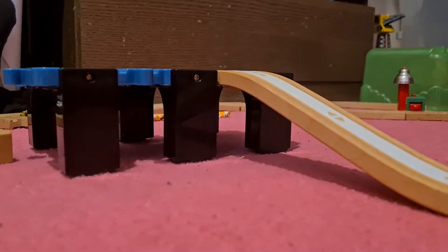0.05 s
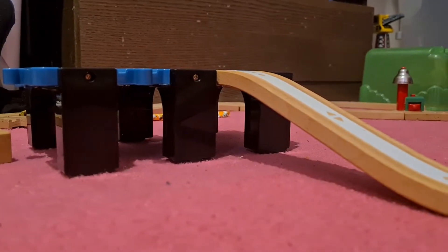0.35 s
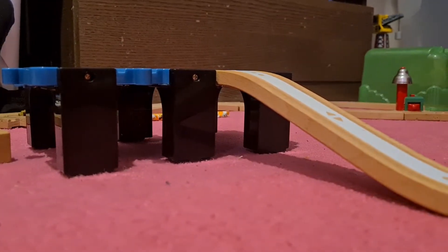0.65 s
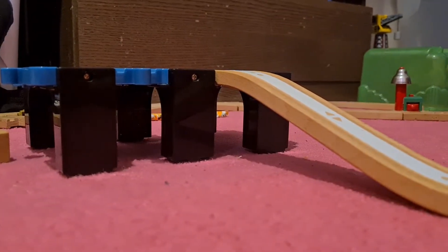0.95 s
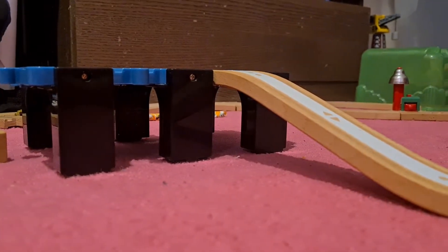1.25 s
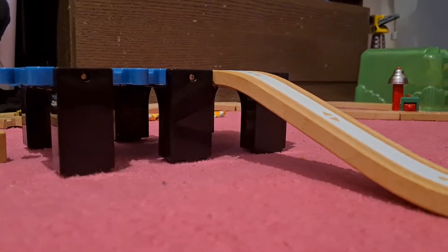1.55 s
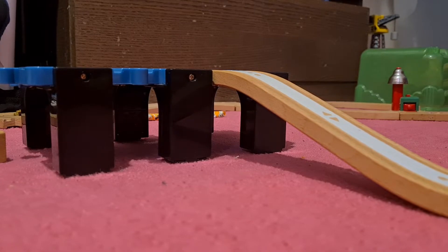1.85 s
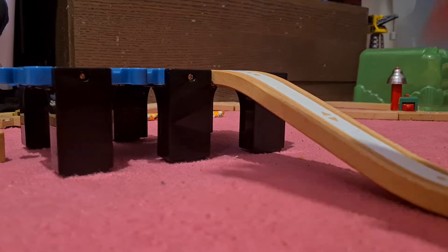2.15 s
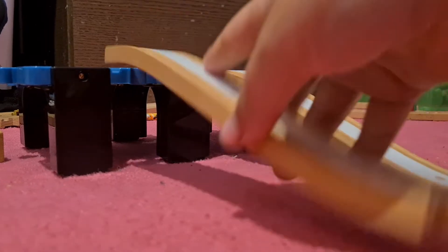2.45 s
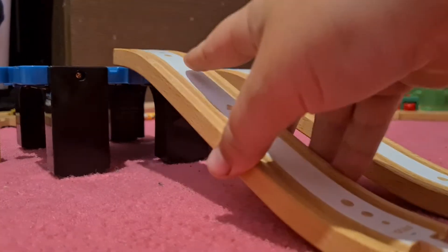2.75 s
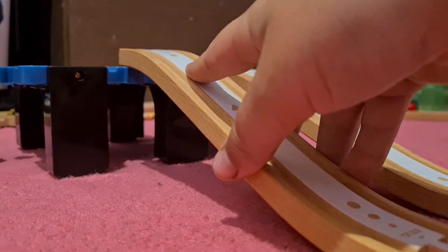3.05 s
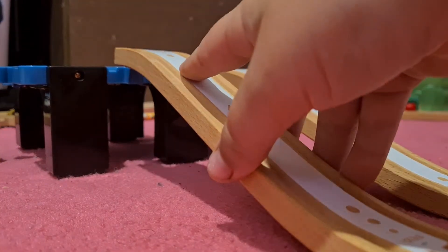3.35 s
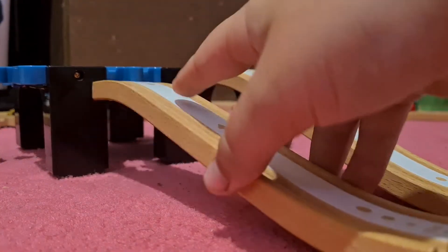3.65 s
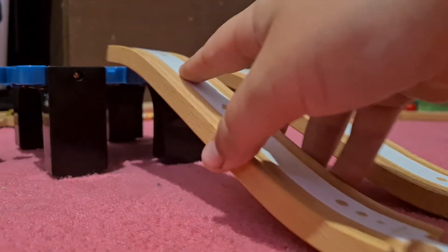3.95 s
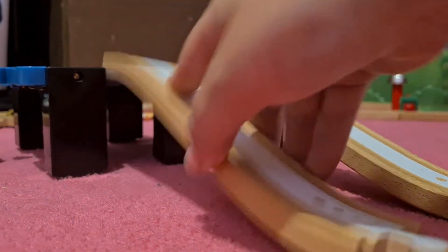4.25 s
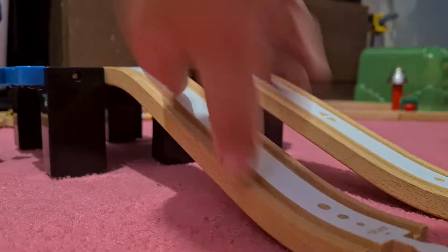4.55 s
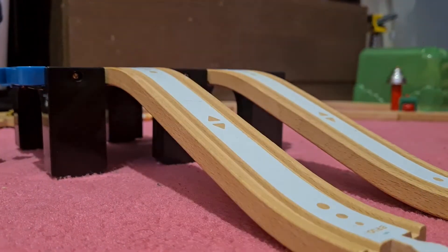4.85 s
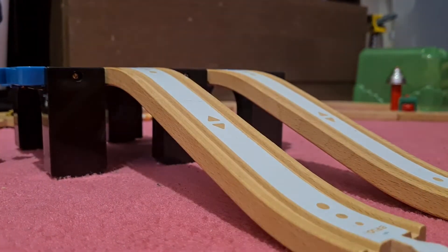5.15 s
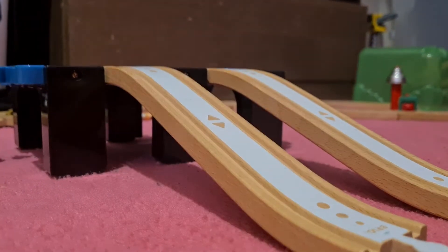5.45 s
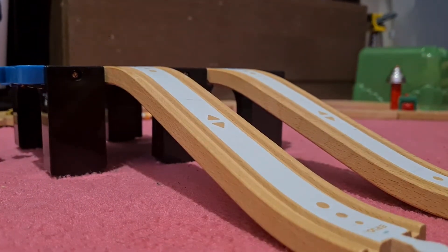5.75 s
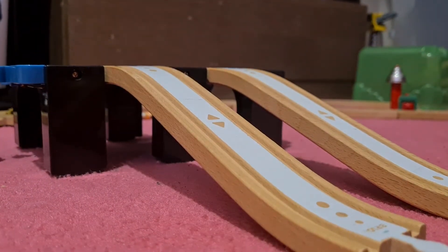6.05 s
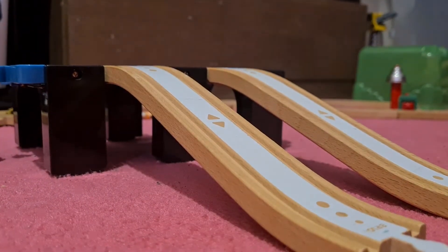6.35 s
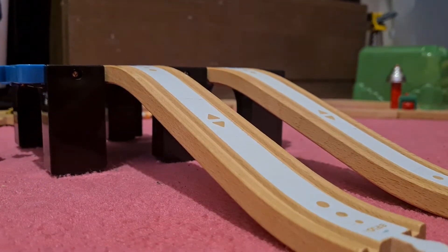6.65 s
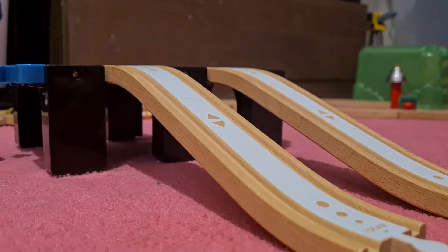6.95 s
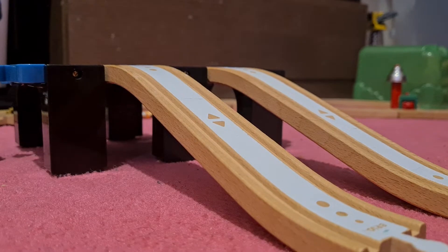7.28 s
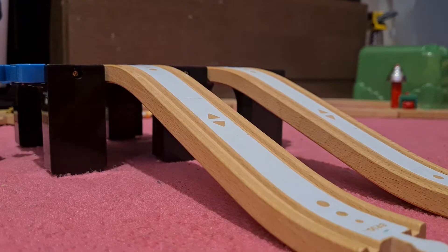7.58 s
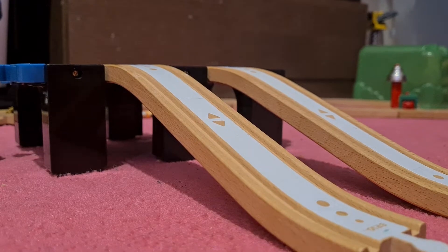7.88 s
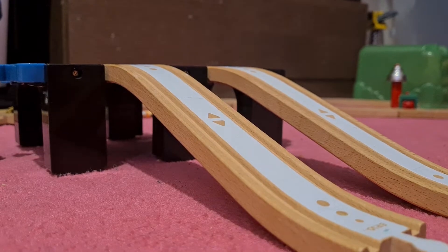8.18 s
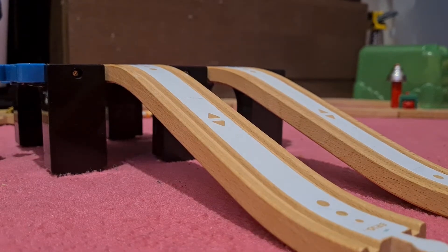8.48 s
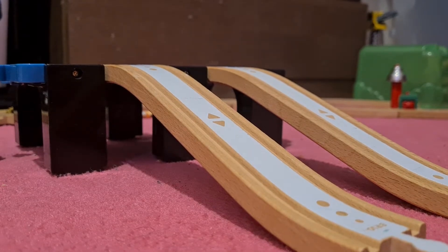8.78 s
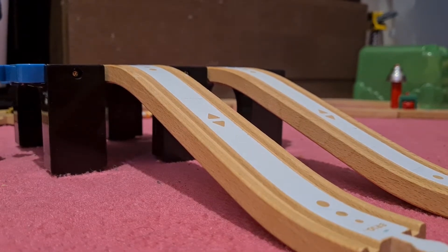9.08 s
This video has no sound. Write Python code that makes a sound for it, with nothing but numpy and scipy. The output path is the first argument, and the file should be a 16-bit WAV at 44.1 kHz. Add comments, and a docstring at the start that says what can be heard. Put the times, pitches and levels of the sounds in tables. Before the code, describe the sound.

In a quiet room, loose wooden toy track pieces clatter briefly on the left. Close to the microphone, a wooden ramp then knocks several times against plastic bridge piers, with soft bumps on the floor, and lands with a sharp clack. A hand rummages through the pile for about two seconds, the pieces sliding, clicking and knocking. Faint finger rubs and carpet brushing fade into room tone.

```python
"""Wooden toy track on a carpet

Indoors, close up, on the two microphone ports of a small stereo camera. A curved wooden ramp is
knocked against plastic bridge piers until it drops into place, ringing at each touch. Off to the
left a hand rummages through loose pieces, which slide, knock and clatter. Fingers rub the wood
and brush the carpet; behind it all lies quiet room tone, with a faint rumble near the end."""
import sys
import numpy as np
from scipy import signal
from scipy.fft import rfft, irfft, next_fast_len
from scipy.io import wavfile
from scipy.ndimage import uniform_filter1d

SR = 44100
rng = np.random.default_rng(int(sys.argv[2]) if len(sys.argv) > 2 else 0)


def to_wav(sig):
    """Store sig (one row per channel, or 1-D mono) as 16-bit WAV at the path in sys.argv[1].

    Samples outside -1..1 are clipped; the rate is SR.
    """
    pcm = np.clip(np.atleast_2d(sig), -1, 1) * 32767
    pcm = np.round(pcm).astype(np.int16)
    wavfile.write(sys.argv[1], SR, pcm.T)  # frames by channels


N = 411012
T = np.arange(SR // 5) / SR  # seconds since a blow
PILE_LEAD_MS = .47  # sound from the pile reaches the left port first

# Loose pieces slide over each other. Each row: start in seconds, length in seconds, relative dB.
SLIDES = [(.215, .045, -47), (0.272, .05, -36), (0.403, 0.044, -40), (0.491, .06, -40), (1.278, 0.036, -60),
          (5.071, .065, -31), (5.235, 0.024, -30), (5.277, .06, -39.5), (5.41, .03, -51),
          (5.51, .14, -45.5), (5.814, .045, -47.5), (6.087, .05, -49), (6.184, .12, -34),
          (6.361, 0.11, -44.5), (6.574, .06, -25), (6.749, .12, -57), (6.908, .1, -37),
          (7.059, .035, -29.5), (7.118, .05, -44.5)]
# Friction spectra of wood on wood and of fingers. Each row: frequency in Hz, relative level in dB.
SLIDE_SPECTRUM = [(30, -22), (70, -8.5), (160, -14.5), (300, 3), (1100, 3), (1600, -2), (2500, 3.5),
                  (3400, -10), (4300, -10.5), (5300, -23.5), (6600, -20), (9500, -47), (12000, -26),
                  (16000, -36)]
FINGER_SPECTRUM = [(200, -20), (900, -3.5), (2300, 1.5), (4200, 2.5), (6500, 4), (9500, -15), (12500, -9),
                   (16000, -12)]
# The ports hear pile and ramp unevenly. Each row: frequency in Hz, left minus right in dB.
PILE_SHADE = [(250, 0.5), (700, -2), (1000, -1), (1300, 3), (1900, 0.5), (2600, 0.5), (9000, -1)]
RAMP_SHADE = [(200, -4.5), (1200, -2.5), (2300, -1.5), (9000, -1)]


def amp(db):
    """Decibels to gain."""
    return 10 ** (np.asarray(db) / 20)


def unit(x):
    """Scale to rms 1."""
    return x / np.sqrt(np.mean(x ** 2) + 1e-20)


def punch(x):
    """Scale a blow to rms 1 over its first hundredth of a second."""
    return x / np.sqrt(np.mean(x[..., :SR // 100] ** 2) + 1e-20)


def along(points, hz):
    """Interpolate (Hz, value) points on a log frequency axis."""
    freqs, values = np.transpose(points)
    return np.interp(np.log(hz + 1), np.log(freqs + 1), values)


def level(rows):
    """(seconds, dB) rows as a gain per sample, silent outside them."""
    times, db = np.transpose(rows)
    return amp(np.interp(np.arange(N) / SR, times, db, left=-140, right=-140))


def filtered(x, response):
    """Filter x by a complex function of frequency."""
    n = x.shape[-1]
    size = next_fast_len(n + SR // 20)
    return irfft(rfft(x, size) * response(np.fft.rfftfreq(size, 1 / SR)), size)[..., :n]


def causal(spectrum, size=2048):
    """The minimum-phase impulse response of a (Hz, dB) spectrum."""
    cepstrum = irfft(np.log(amp(along(spectrum, np.fft.rfftfreq(size, 1 / SR)))))
    cepstrum[1:size // 2] *= 2
    cepstrum[size // 2 + 1:] = 0
    return irfft(np.exp(rfft(cepstrum)))


def convolve(x, response):
    """Both channels of x through an impulse response, cut to the length of x."""
    return signal.fftconvolve(x, np.atleast_2d(response), axes=1)[:, :x.shape[1]]


def fade(t, t60):
    """Decay by 60 dB in t60 seconds."""
    return np.exp(-np.log(1000) * t / t60)


def stereo_noise(n, width):
    """White noise whose side signal is width times as strong as its middle."""
    mid, side = rng.standard_normal((2, n))
    return np.array([mid + width * side, mid - width * side])


def add(track, start, x):
    """Mix x into the track at start seconds."""
    part = track[:, max(round(start * SR), 0):][:, :x.shape[1]]
    part += x[:, :part.shape[1]]


def place(x, lead_ms, shade=((1, 0), (2, 0))):
    """Sound reaches the nearer port first (positive lead: left); the housing shades each port."""
    sign = np.array([[1], [-1]]) / 2
    lag = (abs(lead_ms) / 2 - sign * lead_ms) / 1000
    return filtered(x, lambda hz: np.exp(-2j * np.pi * hz * lag) * amp(sign * along(shade, hz)))


def in_room(x, wet_db):
    """The direct sound and the walls' diffuse answer, which builds over a few milliseconds."""
    # The room's decay. Each row: frequency in Hz, t60 in seconds.
    decay_times = [(100, 0.54), (400, 0.27), (1000, 0.18), (2500, 0.17), (6000, 0.23), (14000, 0.13)]
    # The colour of the reverberation. Each row: frequency in Hz, gain in dB.
    tail_colour = [(50, -11.5), (250, 3), (700, 1), (2200, -1.5), (4500, 1.5), (8000, 3.5), (14000, 8.5)]
    hz, t, bands = signal.stft(rng.standard_normal((2, SR // 2)), SR, nperseg=256)
    bands = bands * fade(t, along(decay_times, hz)[:, None])
    bands[1] *= np.minimum(hz / 600, 1)[:, None]  # long waves reach both ports alike
    mid, side = signal.istft(bands, SR, nperseg=256)[1]
    age = np.arange(len(mid)) / SR
    tail = filtered(unit(np.array([mid + side, mid - side])), lambda f: amp(along(tail_colour, f)))
    tail *= (1 - np.exp(-(age / 0.0028) ** 2)) / np.sqrt(len(age))
    out = amp(wet_db) * signal.fftconvolve(x, tail, axes=1)
    out[:, :x.shape[1]] += x
    return out


def room_tone():
    """Faint air all round the camera, alike at both ports in the bass."""
    # The quiet room. Each row: time in seconds, level in dB.
    hush = [(0, -64), (1, -66), (3.6, -68), (4.8, -63), (9.3, -69)]
    # Its spectrum. Each row: frequency in Hz, relative level in dB.
    air = [(20, -21), (45, -10), (70, 2.5), (150, -10.5), (480, -7), (850, -15), (1400, -16), (2700, -19.5),
           (4000, -25.5), (5400, -21), (7300, -27.5), (9000, -42), (12500, -32), (16000, -37.5)]
    # Likeness at the two ports. Each row: frequency in Hz, left-right correlation.
    likeness = [(60, 1), (240, 0.82), (950, 0.29), (3770, -0.21), (15000, 1)]

    def mid_side_gains(hz):
        angle = np.arccos(np.clip(along(likeness, hz), -1, 1)) / 2
        return amp(along(air, hz)) * [np.cos(angle), np.sin(angle)]

    mid, side = filtered(rng.standard_normal((2, N)), mid_side_gains)
    return level(hush) * unit(np.array([mid + side, mid - side]))


def rumble():
    """A faint, dull rumble comes up near the end, much alike at both ports."""
    # Its swell. Each row: time in seconds, level in dB.
    swell = [(7.6, -91), (8.8, -71.5), (9.0, -65.5), (9.32, -65)]
    colour = causal([(20, -17), (65, 1.0), (220, -12.0), (450, -19.0), (1500, -69)])
    return level(swell) * unit(convolve(stereo_noise(N, width=.25), colour))


def bumps():
    """Hand and wood bump the floor in front of the camera, and near 1.46 s a double knock lands on the camera
    body itself: padded contacts that die quickly."""
    # Each row: start in seconds, level before the low-pass in dB, pitch in Hz, t60 and rise in seconds.
    contacts = [(.176, -18.5, 328.5, 0.025, 0.00067), (0.18, -31, 98.6, .06, 0.0017),
                (1.4635, 9.5, 597, 0.003, 0.0019), (1.4624, -47, 168, 0.02, 0.00058),
                (2.595, -32.5, 60.3, .1, .005), (2.654, -24.5, 106, 0.039, 0.0093),
                (3.875, -28, 103.6, 0.058, 0.016), (4.414, -28, 74.5, 0.21, .004),
                (4.43, -27.5, 152, .1, 0.0029), (5.485, -25.5, 83, 0.088, 0.0018),
                (7.39, -51, 62.53, 0.12, 0.004)]
    lowpass = signal.butter(6, 850, fs=SR, output="sos")
    out = np.zeros((2, N))
    for start, db, hz, t60, rise in contacts:
        push = amp(db) * np.sin(2 * np.pi * hz * T) * fade(T, t60) * (1 - np.exp(-T / rise))
        push = signal.sosfilt(lowpass, push)
        at_ports = place(np.array([push, push]), lead_ms=-.08, shade=RAMP_SHADE)
        add(out, start, in_room(at_ports, wet_db=-13.5))
    return out


def strokes(rows, rise_db_per_s, fall_db_per_s):
    """Gain per sample of (start, length, dB) strokes that swell, hold and die away."""
    t = np.arange(N) / SR
    curves = [db - rise_db_per_s * np.maximum(start - t, 0)
              - fall_db_per_s * np.maximum(t - start - length, 0) for start, length, db in rows]
    return amp(np.max(curves, axis=0))


def friction(spectrum, slips_per_s, spread_db, hiss):
    """Tiny slips of uneven size over a fine hiss, coloured by the surface."""
    slipping = rng.random(N) < slips_per_s / SR
    slips = slipping * amp(spread_db * np.minimum(rng.standard_normal(N), 2))
    return unit(convolve(stereo_noise(N, width=0.72) * (unit(slips) + hiss), causal(spectrum)))


def carpet_brush():
    """A hand brushes the carpet and slides off the pile: soft, dense friction."""
    # Each row: start in seconds, length in seconds, relative level in dB.
    passes = [(0, 0.26, -68.5), (1.3, 0.034, -62), (1.48, 0.42, -69.5), (6.04, 0.055, -70.5),
              (7.12, .04, -57), (7.38, .03, -68.5), (7.62, .25, -68)]
    envelope = strokes(passes, rise_db_per_s=217, fall_db_per_s=168)
    return envelope * friction(FINGER_SPECTRUM, slips_per_s=1800, spread_db=2.0, hiss=1.1)


def finger_rub():
    """Fingers rub the ramp with uneven pressure and make it sing faintly."""
    # Each row: start in seconds, length in seconds, relative level in dB.
    rubs = [(1.82, 0.028, -54.5), (2.045, .04, -55), (2.86, 0.048, -68.5), (3.53, .03, -63.5),
            (7.32, 0.023, -59), (7.78, 0.038, -70), (7.94, 0.038, -66), (9.235, 0.045, -57.5)]
    # The ramp's resonances, damped by the fingers. Each row: centre in Hz, width in Hz, relative dB.
    resonances = [(2290, 170, -5.5), (4080, 110, -7), (6800, 3400, -17)]

    def wood(f):
        return sum(amp(db) / (1 + 2j * (f - hz) / width_hz) for hz, width_hz, db in resonances)

    pressure = amp(4.8 * unit(uniform_filter1d(rng.standard_normal(N), size=900)))
    drag = pressure * friction(FINGER_SPECTRUM, slips_per_s=400, spread_db=2, hiss=0.62)
    return strokes(rubs, rise_db_per_s=800, fall_db_per_s=226) * unit(filtered(drag, wood))


def pile_scrape():
    """Loose pieces slide over each other on the left: grainy friction of wood on wood."""
    envelope = strokes(SLIDES, rise_db_per_s=601, fall_db_per_s=327)
    grain = friction(SLIDE_SPECTRUM, slips_per_s=290, spread_db=-0.5, hiss=0.26)
    return place(envelope * grain, PILE_LEAD_MS, PILE_SHADE)


def handling():
    """Scraping, brushing and rubbing, heard together in the room."""
    direct = amp(-2.0) * pile_scrape() + amp(-0.5) * carpet_brush() + amp(-4.0) * finger_rub()
    return in_room(direct, wet_db=-4.0)[:, :N]


def scuffs():
    """Skin sweeps quickly over the wood: a bright hiss that stops when the hand lifts."""
    # Each row: start in seconds, length in seconds, level in dB.
    sweeps = [(6.287, 0.026, -52.5), (7.17, 0.073, -52.5), (7.385, .035, -60.5)]
    # Skin on wood. Each row: frequency in Hz, relative level in dB.
    spectrum = [(1500, -18.5), (4000, -3.5), (6500, 2.5), (9500, -6), (12500, -1), (16000, -4)]
    envelope = strokes(sweeps, rise_db_per_s=696, fall_db_per_s=900)
    skin = friction(spectrum, slips_per_s=2500, spread_db=0.5, hiss=1.2)
    return in_room(place(envelope * skin, PILE_LEAD_MS), wet_db=-13.5)[:, :N]


def mode(hz, t60, attack_s=.0007):
    """One damped mode, heard at slightly different phases by the two ports."""
    phase = rng.uniform(0, 2 * np.pi) + rng.normal(0, 0.25, (2, 1))
    return np.sin(2 * np.pi * hz * T + phase) * fade(T, t60) * (1 - np.exp(-T / attack_s))


def ringing(modes, scatter_db):
    """A struck body sounds all its (Hz, dB, t60) modes, in a new balance at each blow."""
    return punch(sum(amp(db + rng.normal(0, scatter_db)) * mode(hz, t60) for hz, db, t60 in modes))


def burst(colour, t60, rise, width):
    """A contact wakes a crowd of modes; most of them die within the first instant."""
    decay = fade(T, t60) + 0.51 * fade(T, 0.11 * t60)
    return punch(convolve(stereo_noise(len(T), width) * decay * (1 - np.exp(-T / rise)), colour))


def blow_levels(db, hard_db, voice):
    """Thud, knock, clack and crack levels in dB: a harder contact cracks more and knocks less."""
    thud_db, knock_db, clack_db, crack_db = voice
    return .6 * db + thud_db, db + knock_db - hard_db, db + clack_db, db + crack_db + hard_db


def blow(levels, knock_hz, hollow_t60, crack_t60):
    """Wood strikes: the support thuds and knocks hollowly, the piece clacks, the contact cracks."""
    # Spectra of the four parts. Each row: frequency in Hz, relative level in dB.
    thud_spectrum = [(20, -32), (45, -2), (80, -5.5), (110, 0), (170, 0), (270, 6), (380, -2), (550, -21),
                     (2000, -100)]
    knock_spectrum = [(150, -27.5), (350, -9), (480, -0.5), (800, -1.5), (1250, 7), (1600, -14),
                      (2600, -42), (7000, -100)]
    clack_spectrum = [(700, -37.5), (1300, -7.5), (1700, -4.5), (2200, -2), (2800, 0), (3300, -15.5),
                      (4200, -21), (10000, -85.5)]
    crack_spectrum = [(1800, -26), (3200, -4), (4300, 4), (5300, -7.5), (6300, -1), (7700, -8.5),
                      (9500, -23.5), (12000, -21), (16000, -40.5)]
    thud_db, knock_db, clack_db, crack_db = levels
    rise = 0.0021 * amp(-.45 * (max(knock_db, clack_db) + 23.0))  # light touches start softly
    knock = burst(causal(knock_spectrum), t60=0.027, rise=rise, width=1.0)
    knock = punch(knock + 1.5 * punch(mode(knock_hz, hollow_t60)))
    thud = burst(causal(thud_spectrum), t60=0.029, rise=rise, width=0.18)
    clack = burst(causal(clack_spectrum), t60=0.025, rise=rise, width=0.97)
    crack = burst(causal(crack_spectrum), t60=crack_t60, rise=rise, width=0.63)
    return amp(thud_db) * thud + amp(knock_db) * knock + amp(clack_db) * clack + amp(crack_db) * crack


def pre_swell(db, lead_ms, swell_s):
    """A faint, very short swell of noise leads into each hit."""
    dying = convolve(stereo_noise(len(T), width=0.51) * np.exp(-T / swell_s), causal(SLIDE_SPECTRUM))
    swelling = np.pad(punch(dying)[:, ::-1], ((0, 0), (0, SR // 500)))
    return amp(db) * place(swelling, lead_ms)


def snaps():
    """Hard edges snap past each other, so briefly that they reach the top of the treble."""
    # Each row: start in seconds, relative level in dB.
    contacts = [(.5132, -49), (1.4642, -41.5), (4.4138, -25.5), (4.433, -46.5), (5.109, -42), (5.2625, -38),
                (5.5388, -42), (6.1668, -36.5), (6.557, -32), (6.585, -30), (7.0876, -35)]
    # The colour of a snap. Each row: frequency in Hz, relative level in dB.
    spectrum = [(900, -28), (1500, -2), (2400, 6.5), (3300, -4), (4400, 0.5), (5400, -5), (7000, 0.5),
                (9500, -8.5), (12000, 0.5), (16000, -6.5)]
    out, colour = np.zeros((2, N)), causal(spectrum)
    edge = punch(np.pad(colour, (0, len(T) - len(colour))))
    for start, db in contacts:
        snap = .65 * edge + 0.66 * burst(colour, t60=0.026, rise=.0004, width=0.64)
        add(out, start, in_room(amp(db) * place(snap, PILE_LEAD_MS), wet_db=-10.5))
    return out


def jostles(touches_per_s=15):
    """While the pile slides, pieces touch lightly at random: more strikes for loose_pieces()."""
    rows = []
    for start, length, db in SLIDES:
        count = int(np.ceil(length * touches_per_s))
        for when, softness, hardness, pitch in rng.random((12, 4))[:count]:
            ring_hz, knock_hz = 1900 + 900 * pitch, 850 + 450 * pitch
            hard_db = 8 * (hardness - .5)
            rows.append((start + when * length, db - 6 * softness, hard_db, -4, ring_hz, knock_hz))
    return rows


def loose_pieces():
    """On the left, each struck piece rings at the pitch its length gives it and shakes the pile."""
    # Each row: start in seconds; strength, hardness and relative ring in dB; ring and knock in Hz.
    strikes = [(0.175, -53.5, -1.5, -21, 2150, 693), (0.2736, -37.5, 5, -0.5, 1890, 1210),
               (0.2964, -35, -5, 0, 2240, 1115), (.3083, -42.5, -9, 4, 2300, 1066),
               (.379, -33, 4, 3, 1935, 1133), (0.3946, -36.5, 2.5, 1, 2040, 1016),
               (0.4363, -35.5, 1.5, -8, 2700, 1126), (0.5129, -30.5, -1, 5.5, 2224, 866),
               (0.5341, -33.5, 5.5, -10.5, 2300, 1372), (5.0596, -25.5, 2, -4.5, 2010, 1134),
               (5.1075, -25, 0.5, -20, 2070, 803), (5.1236, -27.5, 2.5, -0.5, 2170, 798),
               (5.1308, -23.5, 3.5, 0, 2170, 1203), (5.184, -43, 10, -11.5, 2000, 1157),
               (5.2185, -23.5, 0, 8.5, 3057, 1240), (5.2378, -23.5, -2, -6, 2940, 1036),
               (5.2616, -19.5, 4, -3.5, 2556, 1026), (5.322, -32, 2.5, -18, 2460, 1090),
               (5.3464, -45, 5.5, -4.5, 2400, 1040), (5.3812, -41, 2, -8, 2330, 1212),
               (5.4361, -52.5, -7.5, 6.5, 2360, 1015), (5.4781, -41, -4.5, -1.5, 2290, 1009),
               (5.5379, -25.5, 4.5, -4.5, 2990, 1117), (5.558, -40.5, -4, -1.5, 2250, 577),
               (5.6024, -39.5, -0.5, -3.5, 2240, 1250), (5.8204, -28, 5.5, -1, 2384, 1028),
               (5.9787, -66, -1, 14, 2430, 993), (6.1129, -36.5, -3, 2.5, 2270, 1153),
               (6.166, -16, 2, -9.5, 2274, 1069), (6.2385, -35.5, -4, -1, 2430, 1113),
               (6.2604, -30.5, -1, 8, 2720, 982), (6.2816, -36.5, -3, -3, 2330, 1027),
               (6.292, -30, 8, -15.5, 2270, 1066), (6.3361, -36.5, 3, 0.5, 2325, 890),
               (6.3953, -29.5, 0, 11, 2237, 922), (6.4272, -37.5, -12.5, -4, 2340, 945),
               (6.4415, -39.5, -7.5, -22.5, 2180, 880), (6.462, -32, -7.5, -9, 2360, 886),
               (6.4712, -30.5, -0.5, -4.5, 2020, 917), (6.556, -20, 5.5, -13.5, 1840, 1231),
               (6.5807, -17.5, 3.5, -7.5, 2050, 1097), (6.5858, -20.5, 7.5, -4.5, 1980, 600),
               (6.603, -30, -0.5, -16.5, 2060, 989), (6.6197, -27.5, 4, -0.5, 3270, 728),
               (6.644, -35, 5.5, -11.5, 2450, 1013), (6.7596, -36, 2.5, -6.5, 2140, 1175),
               (6.806, -43.5, 3, -1.5, 2230, 1030), (6.8344, -46, 1.5, -21, 2070, 863),
               (6.9207, -28, -0.5, 0, 2516, 1160), (6.9315, -33, -1.5, 6.5, 3020, 1084),
               (6.9612, -36, -7, 0, 2310, 1133), (6.995, -28, -2.5, 1, 2280, 1158),
               (7.0416, -33, -0.5, -11, 2270, 1170), (7.0863, -19, 5.5, -12.5, 2160, 855),
               (7.1625, -33, 2.5, -5.5, 2240, 1182), (7.33, -61.5, -2.5, -3, 2700, 1017),
               (7.6312, -63.5, 22, -22, 2310, 693), (8.0926, -65, 2.5, -5, 2360, 625)]
    # The balance of a blow: offsets of thud, knock, clack and crack in dB.
    voice = (-24, 3.5, -0.54, -11.5)
    # A piece's upper modes. Each row: multiple of its ring pitch, relative level in dB.
    overtones = [(1.85, -19.5), (2.8, -26)]
    # What the pile lies on booms. Each row: frequency in Hz, relative level in dB, t60 in seconds.
    support_modes = [(126.1, -10.5, 0.26), (211, -6.5, 0.079), (282.5, -5, 0.25), (370.3, 2.5, 0.082),
                     (451, 5, 0.058), (588, 1.5, 0.11), (736, -6.5, 0.053), (895, -8.5, 0.059)]
    out = np.zeros((2, N))
    for start, db, hard_db, ring_db, ring_hz, knock_hz in strikes + jostles():
        levels = blow_levels(db, hard_db, voice)
        thud_db, knock_db, clack_db, _ = levels
        upper = sum(amp(mode_db + hard_db + rng.normal(0, 3)) * mode(ratio * ring_hz, t60=0.017)
                    for ratio, mode_db in overtones)
        ring = amp(db + ring_db + .5) * punch(mode(ring_hz, t60=.034) + upper)
        boom = amp((thud_db + knock_db) / 2 - 3.5) * ringing(support_modes, scatter_db=2.6)
        strike = blow(levels, knock_hz, hollow_t60=0.054, crack_t60=0.017)
        contact = place(boom + strike, PILE_LEAD_MS, PILE_SHADE)
        # The whole length rings, a little nearer the middle than the point of contact.
        body = place(ring, lead_ms=.41, shade=PILE_SHADE)
        add(out, start, in_room(contact + body, wet_db=-7.0))
        add(out, start - len(T) / SR, pre_swell(clack_db - 13.5, PILE_LEAD_MS, swell_s=0.0043))
    return out


def ramp():
    """Close to the camera, the hand-held ramp meets the piers and rings with the same modes each time."""
    # Each row: start in seconds; strength, hardness and relative ring in dB; knock pitch in Hz.
    strikes = [(1.976, -63, -7, -7, 620), (1.9941, -61, -7.5, -1, 575), (2.1091, -62.5, 21, 11.5, 760),
               (2.5727, -22, 5.5, 9, 766), (2.5915, -26.5, -2, 3.5, 754), (2.5995, -39.5, 1, 12.5, 770),
               (2.8692, -60, 2, 7, 1100), (2.8894, -48.5, -1, -1, 990), (3.5354, -42, -6, -11, 905),
               (3.6099, -68, 11, 16, 880), (3.7087, -56.5, 15.5, -10, 620), (3.736, -30.5, 3.5, 6, 1020),
               (3.7737, -66, 3, 5, 910), (3.8465, -56.5, -6.5, -5.5, 780), (4.0541, -33, 5, 5, 758),
               (4.1214, -44, -4.5, 7.5, 871), (4.254, -64, 7.5, -4, 898), (4.3596, -40.5, -9.5, -15.5, 951),
               (4.3877, -36, -4, -1.5, 973), (4.4114, -16, 2.5, -10, 722), (4.4374, -29, -1, -8, 1272),
               (4.6196, -58.5, -6, -20, 767), (4.6531, -43, -8, -40, 789), (4.6851, -53, 13, -16.5, 760),
               (9.233, -72, 14, -1, 760)]
    # The balance of a blow: offsets of thud, knock, clack and crack in dB.
    voice = (-31, 1, -1.97, -10.5)
    # The ramp against its piers. Each row: frequency in Hz, relative level in dB, t60 in seconds.
    modes = [(607, -21, .12), (757, -15, 0.092), (2080, -19.5, .05), (2239, 5.5, 0.033),
             (2680, -26.5, 0.025), (2950, -12.5, 0.048), (4360, -17, 0.025), (5864, -28.5, 0.034),
             (7560, -31, 0.043)]
    # Held on the right, it lands on the left. Each row: time in seconds, left port's lead in ms.
    path = [(4.25, -.48), (4.35, .55)]
    out = np.zeros((2, N))
    for start, db, hard_db, ring_db, knock_hz in strikes:
        levels = blow_levels(db, hard_db, voice)
        _, _, clack_db, _ = levels
        lead_ms = np.interp(start, *np.transpose(path))
        ring = amp(db + ring_db + 1.5) * ringing(modes, scatter_db=2.3)
        strike = blow(levels, knock_hz, hollow_t60=0.028, crack_t60=0.009)
        add(out, start, in_room(place(ring + strike, lead_ms, RAMP_SHADE), wet_db=-10.0))
        add(out, start - len(T) / SR, pre_swell(clack_db - 13.5, lead_ms, swell_s=0.0051))
    return out


def scene():
    """All sources at the two microphone ports."""
    return ramp() + loose_pieces() + snaps() + handling() + scuffs() + bumps() + room_tone() + rumble()


def record(dry):
    """The camera rounds off the highest peaks and keeps nothing above its band limit."""
    rounded = dry / (1 + np.abs(dry) ** 8) ** (1 / 8)
    return filtered(rounded, lambda hz: hz < 16200)


dry = scene()
out = record(dry)
to_wav(out)
```